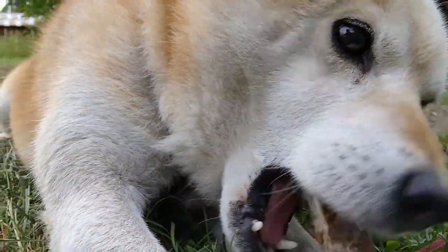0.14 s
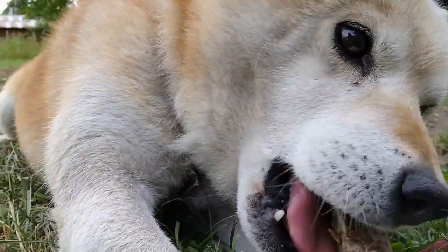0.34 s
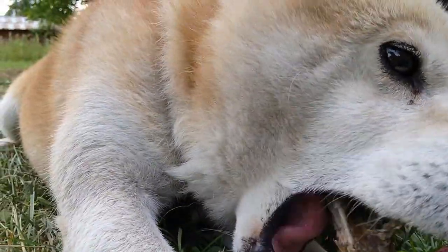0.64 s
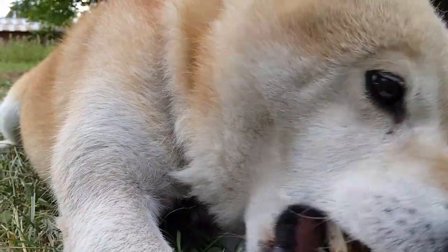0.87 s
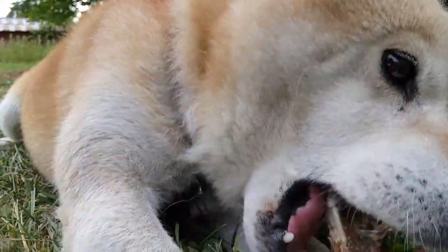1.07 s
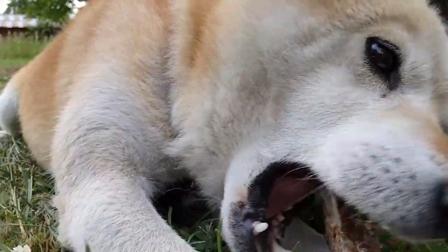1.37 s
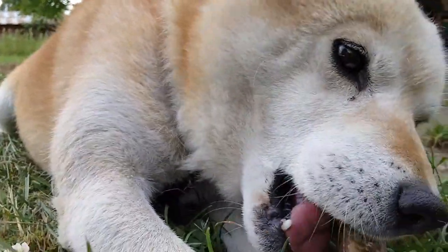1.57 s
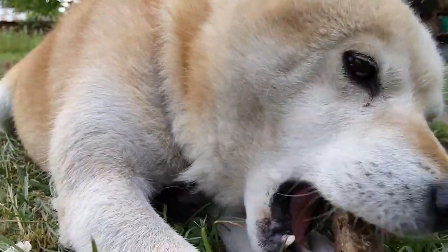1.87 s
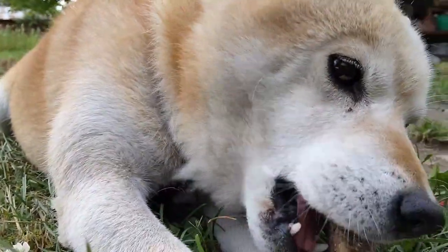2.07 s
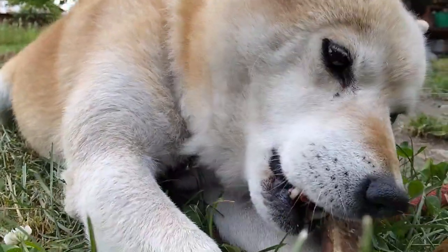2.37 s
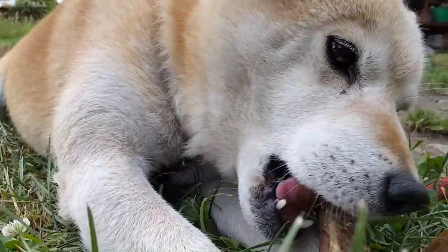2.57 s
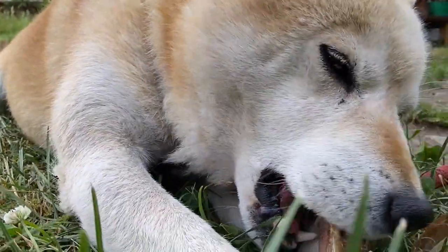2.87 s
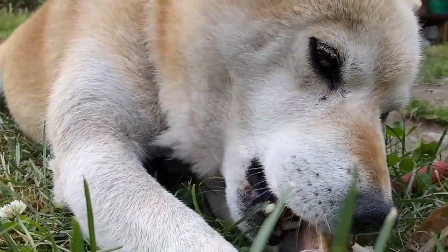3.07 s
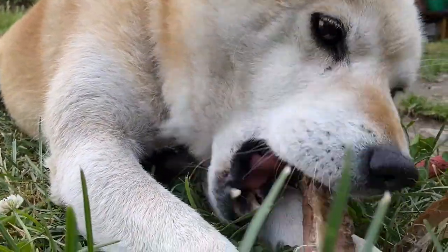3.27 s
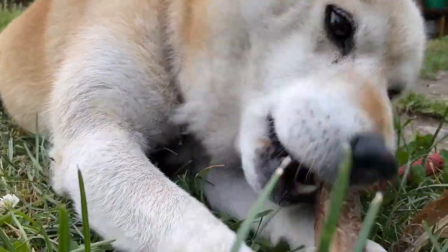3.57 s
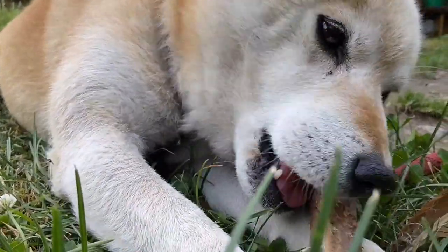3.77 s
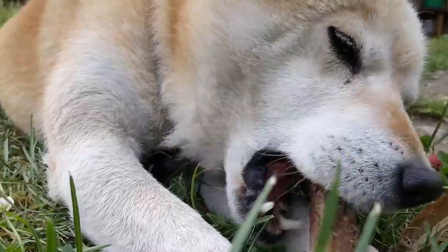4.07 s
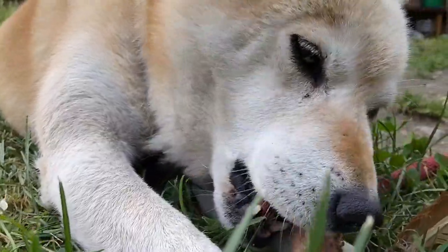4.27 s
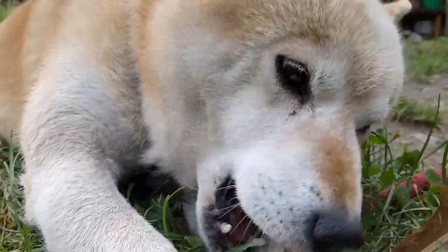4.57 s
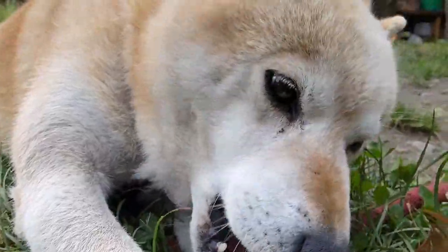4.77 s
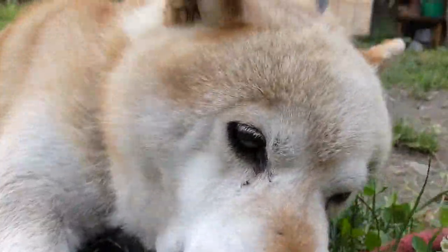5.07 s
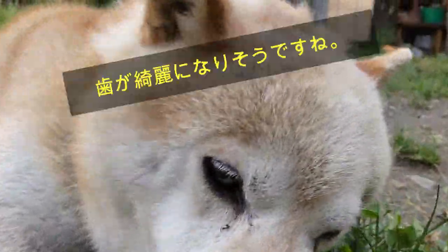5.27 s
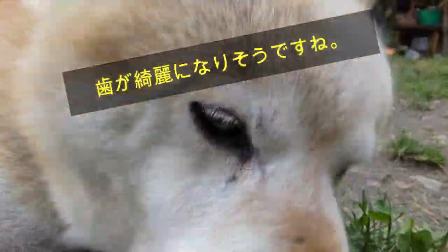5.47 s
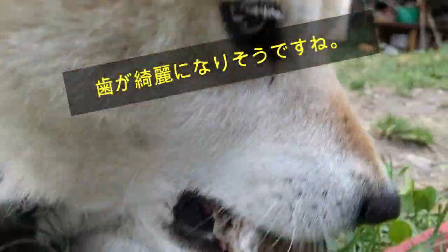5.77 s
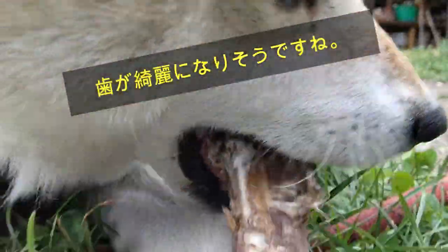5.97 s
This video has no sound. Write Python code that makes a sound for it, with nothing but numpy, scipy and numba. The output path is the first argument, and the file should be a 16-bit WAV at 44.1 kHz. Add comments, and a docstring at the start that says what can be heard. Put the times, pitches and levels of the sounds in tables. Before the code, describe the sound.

A dog gnaws a bone close by on the right, irregular sharp crunches and cracks with scraping teeth and small puffs over soft outdoor hiss.

```python
"""On a lawn, a dog gnaws a bone close to a small camera and a little to its right.
Each bite is a short run of tiny fractures that rings the bone and knocks the hollow of the mouth.
Between bites the teeth scrape; the dog puffs through nose and throat, which are resonators
driven by air noise, and grunts once. Leaves and far traffic are shaped noise: hiss and rumble.
"""
import sys
import numpy as np
from scipy import signal
from scipy.fft import rfft, irfft, next_fast_len
from scipy.io import wavfile
from scipy.ndimage import uniform_filter1d
from numba import njit

SR = 44100
rng = np.random.default_rng(int(sys.argv[2]) if len(sys.argv) > 2 else 0)


def wav_out(sig):
    """Save sig, one row per channel (or a flat mono array), as 16-bit PCM at SR to the path in sys.argv[1]."""
    wavfile.write(sys.argv[1], SR, np.round(np.clip(np.atleast_2d(sig).T, -1, 1) * 32767).astype(np.int16))


N = 270333


def undb(db):
    """Level definition: amplitude gain is ten to the power dB / 20."""
    return 10 ** (np.asarray(db) / 20)


def mode(f, hz, width):
    """Simple resonance: the response of one damped oscillator, gain 1 at its centre."""
    return 1j * f * width / (hz ** 2 - f ** 2 + 1j * f * width)


def modes(f, table):
    """Modal superposition: neighbours swing in opposite phase; squaring gives steep skirts."""
    total = 0
    for k, (hz, width, db) in enumerate(table):
        total = total + (-1) ** k * undb(db) * mode(f, hz, width) ** 2
    return total


def on_log(f, hz, value):
    """Logarithmic pitch scale: read a table by linear interpolation over log frequency."""
    return np.interp(np.log(f + 1), np.log(hz), value)


def over_time(table):
    """Envelope principle: join the points (t/s, level/dB) by straight lines, one value a sample."""
    return np.interp(np.arange(N) / SR, *np.transpose(table))


def walk(rate):
    """Random modulation: levels held 1 / rate s, then smoothed twice; spread near 1."""
    hold = int(SR / rate)
    steps = np.repeat(rng.standard_normal(N // hold + 1), hold)
    return 1.3 * uniform_filter1d(uniform_filter1d(steps, hold), hold)[:N]


# Modes of the bone shaft, its splinters and the tooth enamel, and of the jaw.
# Columns: f/Hz, width of one pass/Hz, relative level/dB
SHAFT_MODES = [(1760, 560, -5.5), (2540, 1150, -3)]
SPLINTER_MODES = [(3617, 756, 7), (3770, 686, 8.5), (5060, 2900, 0)]
ENAMEL_MODES = [(6110, 1330, 5.2), (7370, 830, 3.8), (7220, 1900, 3.8), (12500, 3900, 1)]
JAW_MODES = [(243, 300, 0), (579, 500, -4.5)]
# Stereo balance of the bites before shading. Columns: t/s, left minus right level/dB
HEAD_BALANCE = [(0, -10.5), (.8, -11.5), (1.05, -13), (1.3, 1), (2.05, -11), (2.37, -7.5), (3.6, -9.5),
                (4.8, -5), (6.13, -3)]
# Single bites. Columns: peak t/s, rise/ms, fall/ms, crack level/dB,
# brightness (-1 shaft, 0 splinter, 1 enamel), knock level/dB, mouth hollow f/Hz, width over f
BITES = [(.1267, 1.6, 2.1, -50, -.2, -50, 1200, .9), (.1373, 3, 4, -47, -0.053, -52.5, 1200, 0.75),
         (.161, 1.05, .7, -49, 0.72, -49, 700, 1.5), (.1843, .25, .9, -49, -.1, -69, 1200, .9),
         (.2064, .4, 0.97, -45, .2, -55, 1200, .9), (.2151, 2.1, 0.57, -33.5, 0.92, -46, 1200, .9),
         (.2186, 1.2, 1.4, -27, 0.02, -35.5, 1220, 0.61), (.227, 2.8, 3.8, -35.5, 0.17, -44, 980, 1.1),
         (.2432, 2, 1.6, -40, .2, -46, 980, 1.2), (.25, 6.7, 3.4, -36.5, 0.048, -34.5, 593, 2.5),
         (.2662, 1.7, 1.1, -46, 0.98, -44, 340, 0.64), (.312, 2.55, 2.4, -44, -0.36, -43.5, 1100, 0.076),
         (.3203, 5.3, 1.4, -46, -0.07, -42.5, 1080, 0.14), (.573, 0.21, .4, -50, 1.2, -69, 700, 1.5),
         (.607, 0.31, .4, -51, 0.9, -63, 1200, .9), (.6272, 0.34, .2, -43, 1.5, -62, 700, 1.5),
         (0.7482, 3.3, 10, -42, -0.15, -47.5, 1200, 1.3), (.7644, 2.1, 5.6, -44, -0.061, -49, 1180, 0.81),
         (0.8093, 1.5, 10.5, -39.5, -0.6, -39, 506, 1.2), (.817, 0.68, 1.4, -45, -0.098, -39, 680, 2.2),
         (.823, 3.4, 1.1, -37.5, -0.23, -45.5, 1200, .9), (.852, 1.4, 3.4, -44, .2, -47, 1200, 1),
         (.862, 4.3, 1.7, -44, -.3, -50, 1200, .9), (.8721, 0.81, 0.55, -34, .5, -45, 1200, .9),
         (.8957, 5.8, 1.9, -46, -0.28, -62, 1200, .9), (.903, 2.4, 2.6, -42, -0.31, -47, 800, 1.4),
         (.9154, 0.5, .4, -34, 0.85, -46, 1200, .9), (.9214, 1.9, 1.8, -34, 0.81, -43, 1200, .9),
         (.9251, .6, 0.68, -38, 0.9, -49, 1170, .9), (.9317, 2.7, .9, -49, .25, -56, 1100, .9),
         (.943, 5.1, 3.5, -36, -0.02, -43.5, 1210, 1.2),
         (.948, 1.27, 0.68, -22.5, -0.073, -31.5, 1330, 0.53),
         (.9524, 1.33, 2.5, -22.5, 0.79, -29.5, 1320, .85), (.9596, 2.3, 1.8, -29, -1.2, -33, 950, 1.1),
         (.9645, 2.3, 2.2, -37, -0.49, -37, 804, 1.4), (.9923, 0.84, 1.3, -47, -.2, -49, 600, 1.5),
         (1.0167, 0.37, 1.6, -29.5, 0.2, -42, 1030, 0.79), (1.0217, 1.8, 2.8, -38, -0.16, -38, 920, 1.6),
         (1.0275, 3.17, 2.2, -37.5, -0.63, -32, 980, 1.45), (1.1016, 0.42, 1.6, -40, 1.4, -54.5, 1200, .9),
         (1.1075, 1.3, 0.49, -38, 0.89, -56, 1150, .9), (1.2057, 0.92, 0.73, -46, -0.054, -69, 1200, .9),
         (1.4712, 0.75, 0.72, -48.5, -.5, -53, 770, 1.2), (1.5318, .55, 2.6, -59, .1, -46, 950, 0.37),
         (1.57, 0.52, .7, -50, -.4, -61, 1200, .9), (1.7958, .8, 0.35, -44.5, 1.1, -69, 700, 1.5),
         (2.0361, 3.7, 2, -46, -.6, -66, 950, 1), (2.0576, 1.6, .6, -45.5, -.2, -38, 890, 0.77),
         (2.0641, 2, 3, -48, -0.15, -47, 1170, .9), (2.073, 3.5, 5, -52, .1, -44, 1180, 0.74),
         (2.345, 0.37, 1.3, -34, 0.17, -45, 1200, 0.79), (2.356, 1.1, 1.9, -37, -0.23, -45, 900, 1.1),
         (2.3654, 0.92, 1, -45, 0.71, -28, 480, 1), (2.3679, 2.1, 1.34, -21, -0.39, -20, 926, 0.42),
         (2.377, 3.8, 3.7, -49, .5, -44, 1060, .4), (2.5677, 1.2, 4.9, -45, -0.12, -64, 1130, .9),
         (2.6066, 2.1, 1.5, -40.5, 1.4, -49, 920, 1.2), (2.8068, 0.66, 0.43, -42.5, 0.27, -68, 1200, .9),
         (2.813, .2, 0.22, -51, .1, -69, 1200, .9), (2.907, 0.88, 1.8, -56, -.4, -51, 870, 1.5),
         (2.977, 0.95, 0.55, -53, -.4, -49, 720, 1), (3.3715, 0.57, 0.38, -47, .1, -58, 1200, .9),
         (3.469, .8, .75, -61, -.05, -48, 810, 1.5), (3.486, 1.2, 4.2, -53, 0.024, -48.5, 1190, 0.83),
         (3.533, 2.7, 2.1, -45, -0.59, -43, 850, 0.34),
         (3.6067, 1.08, 1.1, -46.5, -0.79, -36.5, 1130, 0.29),
         (3.6668, 3.3, 1.55, -40, 0.27, -38, 1020, 0.68), (3.6724, 1.17, 2.8, -29, -0.099, -37, 920, 0.74),
         (3.6765, 1.9, 1.9, -54, .5, -29, 580, 0.93), (3.7021, 0.69, 1.2, -52, 0.44, -40.5, 1020, 0.2),
         (3.754, 1.1, 1.4, -63, .6, -43.5, 790, 0.75), (4.114, 0.41, .4, -49, -0.045, -53, 1200, .9),
         (4.1548, 4.7, 1.9, -48.5, -.9, -41.5, 860, .17), (4.1616, 0.56, 2.2, -57, -0.6, -35.5, 860, 0.82),
         (4.7096, .7, 4.2, -45, -.5, -32, 700, 0.96), (4.72, 2.3, 1.6, -58, -.8, -42, 690, 0.65),
         (4.7936, 0.61, 2.5, -38.5, -0.21, -45, 1240, 1.2),
         (4.7992, 0.78, 2.1, -35.5, 0.93, -42.5, 1280, .9), (4.9252, .75, 1.1, -60, .7, -48.5, 507, 0.77),
         (5.1614, 0.92, .6, -63, .5, -35.5, 490, 0.81), (5.209, 1.2, .6, -51, -0.13, -47, 875, 1),
         (5.237, 0.67, 1.8, -43.5, -1.2, -35, 710, 0.81), (5.248, 1, 0.61, -57, -.2, -40, 595, 1.1),
         (5.2968, 0.75, .8, -63, -.9, -44.5, 780, 1.7), (5.4204, 0.61, .3, -38.5, 1.24, -69, 1200, .9),
         (5.7072, 3.1, 4.7, -57, .9, -48, 800, 1.1), (5.7183, 2.08, 1.4, -63, .5, -32.5, 1355, 0.17),
         (5.7567, .6, .9, -62, -0.73, -46, 1200, 1.4), (5.837, 0.88, 0.93, -51.5, -.5, -42, 580, 0.47)]


def bites(grit_db=4.0, early=0.385, shadow_hz=756.0, lag_ms=0.027, window_ms=2.82):
    """Brittle fracture: bursts of uneven impulses excite the modes of bone, teeth, mouth and jaw."""
    span = 4096  # samples for each bite
    columns = [column[:, None] for column in np.transpose(BITES)]
    t_peak, rise, fall, crack_db, bright, knock_db, hollow_hz, width = columns

    # more knock than crack: one clean blow in a closed mouth; closed stays below 2/3
    closed_at_db, closed_span_db = 8, 2  # knock over crack, and how gradually
    closed = 1 / (1.5 + np.exp((closed_at_db - knock_db + crack_db) / closed_span_db))
    snap_db = 17.5 + (29.5 - 17.5) * closed  # over the grit
    jaw_db = -7.5 + (-8.5 + 7.5) * closed  # relative to the knock
    off_part_db = 7  # loss one part away from the brightness
    bone_db = [crack_db - off_part_db * (part - bright) ** 2 for part in (-1, 0, 1)]
    part_db = [knock_db + jaw_db, knock_db] + bone_db
    # a closed knock sits nearer the middle
    pan_db = np.interp(t_peak, *np.transpose(HEAD_BALANCE)) * (1 - .6 * closed)

    f, lead = np.fft.rfftfreq(span, 1 / SR), span // 4
    ms = (np.arange(span) - lead) / SR * 1000
    force = np.exp(-np.where(ms < 0, -ms / rise, ms / fall))

    def fractures():
        # sizes with an exponential spread in dB: many small fractures, a few sharp ones
        turn, size = rng.random((2, len(t_peak), span))
        return force * np.sign(turn - .5) * undb(-grit_db * np.log(1 - size))

    # one main snap, a share of the rise time ahead of the peak
    snap = -undb(snap_db) * np.exp(-2j * np.pi * f * (lead / SR - early * rise / 1000))
    direct = rfft(fractures()) + snap

    # the muzzle shadows the left port above shadow_hz and adds a scattered path
    shade = f ** 2 / (f ** 2 + shadow_hz ** 2)
    scattered = .9 * shade  # share of the power at the left port
    delay = np.exp(-2j * np.pi * f * lag_ms / 1000)
    left = np.sqrt(1 - scattered) * direct * delay + np.sqrt(scattered) * rfft(fractures())
    ports = np.array([left * undb(pan_db * shade / 2), direct * undb(-pan_db * shade / 2)])

    # the hollow rings on top of a short, broad clack
    clack_db, clack_width = -21.5, 1.2  # relative to the ring; width over pitch
    ring = mode(f, hollow_hz, width * hollow_hz) ** 2
    clack = undb(clack_db) * mode(f, hollow_hz, clack_width * hollow_hz) ** 2
    shapes = [modes(f, JAW_MODES), ring + clack]
    shapes += [modes(f, part) for part in (SHAFT_MODES, SPLINTER_MODES, ENAMEL_MODES)]

    sound = 0
    for shape, db in zip(shapes, part_db):
        pair = irfft(ports * shape)
        # the level is that of the loudest short window of the two-channel mean
        power = uniform_filter1d(pair.mean(0) ** 2, int(window_ms * SR / 1000))
        sound = sound + pair * undb(db) / np.sqrt(power.max(1, keepdims=True))
    out = np.zeros((2, N + 2 * span))
    for k, start in enumerate((t_peak[:, 0] * SR).astype(int) - lead + span):
        out[:, start:start + span] += sound[:, k]
    return out[:, span:span + N]


# Teeth scraping between bites. Columns: t/s, level/dB (before panning)
SCRAPE = [(0, -70), (.27, -50), (.35, -81), (.72, -62), (.8, -53), (.96, -44), (1.005, -60), (1.04, -52),
          (1.12, -62), (1.6, -56), (1.75, -92), (2.02, -55), (2.12, -80), (2.36, -48.5), (2.5, -57),
          (3.4, -83), (3.52, -58.5), (3.8, -57.5), (4.15, -61), (4.4, -59), (5.0, -66), (5.25, -55.5),
          (5.5, -62.5), (6.13, -73)]


def grind(per_second=1800., grit_db=4.0, patchy_db=6.5, pan_db=-6.5, low_db=4.0, top_db=-2.0):
    """Random impulse excitation: crumbs of bone give way under the teeth, in patches."""
    hit, size, turn = rng.random((3, N))
    crumb_db = -grit_db * np.log(1 - .99 * size) + patchy_db * walk(60)
    crumbs = (hit < per_second / SR) * np.sign(turn - .5) * undb(crumb_db)
    f = np.fft.rfftfreq(N, 1 / SR)
    bone = undb(low_db) * mode(f, 1360.0, 620.0)
    bone = bone + modes(f, SHAFT_MODES) + modes(f, SPLINTER_MODES)
    bone = bone + undb(top_db) * modes(f, ENAMEL_MODES)
    sound = irfft(rfft(crumbs) * bone, N)
    sound = sound / sound.std() * undb(over_time(SCRAPE))
    # left comes 3 samples later
    return np.array([np.roll(sound, 3) * undb(pan_db / 2), sound * undb(-pan_db / 2)])


@njit
def sliding_resonance(x, hz, width):
    """State-variable resonance: two integrators in a loop form a band-pass with a moving centre."""
    y, band, low = np.empty(len(x)), 0., 0.
    for i in range(len(x)):
        g, damping = np.tan(np.pi * hz[i] / SR), width / hz[i]
        v = (band + g * (x[i] - low)) / (1 + g * (g + damping))
        band, low, y[i] = 2 * v - band, low + 2 * g * v, damping * v
    return y


# Breaths. Columns: start t/s, length/s, throat level/dB, nose level/dB (at the height of
# the flow, before panning), nose f/Hz at the start
PUFFS = [(0.344, .019, -58, -70, 3500), (1.402, 0.061, -77, -57, 3300), (1.846, .093, -80, -52.5, 4250),
         (2.143, 0.17, -58.5, -74, 3500), (2.397, .16, -51, -55.5, 3370), (2.622, 0.077, -62.5, -64, 3000),
         (2.977, 0.062, -84, -58.5, 3420), (3.13, 0.099, -56.5, -82, 3500), (3.642, 0.033, -60, -47, 4400),
         (3.665, 0.069, -55.5, -56, 3900), (4.238, 0.13, -60.5, -58.5, 4150),
         (5.06, 0.14, -74, -59.5, 3650), (5.84, 0.033, -57, -56, 2050)]


def puffs(throat_width=150., nose_width=600., flutter_db=1.5, pan_db=-6.0):
    """Turbulence noise: air excites a narrow throat resonance and a wider, sinking nose one."""
    throat_hz, nose_sag = 1085., 0.2  # the nose sinks by this share over a puff
    t = np.arange(N) / SR
    throat, nose, nose_hz = np.zeros(N), np.zeros(N), np.full(N, 3000.)
    for start, length, throat_db, nose_db, from_hz in PUFFS:
        u = (t - start) / length
        on = (u > 0) & (u < 1)
        flow = np.sqrt(np.sin(np.pi * u[on]))
        throat[on], nose[on] = undb(throat_db) * flow, undb(nose_db) * flow
        nose_hz[on] = from_hz * (1 - nose_sag * u[on])
    air = rng.standard_normal(N) * undb(flutter_db * walk(70))

    def resonate(hz, width):
        # make up for the power lost outside the band
        return sliding_resonance(air, hz, width) * np.sqrt(SR / (np.pi * width))

    both = throat * resonate(np.full(N, throat_hz), throat_width)
    both = both + nose * resonate(nose_hz, nose_width)
    return both * undb(np.array([[pan_db], [-pan_db]]) / 2)


# The one grunt. Values: start t/s, length/s, f/Hz, peak level/dB
GRUNT = (3.495, .045, 215, -50)


def grunt():
    """Pure tone: a short low hum from the throat under a rounded envelope, alike in both channels."""
    start, length, hz, db = GRUNT
    t = np.arange(N) / SR - start
    swell = np.sqrt(np.sin(np.pi * np.clip(t / length, 0, 1)).clip(0))
    return undb(db) * swell * np.sin(2 * np.pi * hz * t)


# Background spectrum. Columns: f/Hz, relative level per Hz/dB,
# likeness of the channels (0 to 1), left minus right level/dB
GARDEN = [(25.7, 8.5, 0.5, 5), (42, -3.5, 0.1, 5), (70, -2, 0.2, -3), (111, -5.5, 0.9, -3),
          (190, 0, 0.76, -0.5), (337, 1, 0.88, -2), (560, -4, 0.52, -1), (850, -9, 0.56, -1.5),
          (1830, -7.5, 0, -3.5), (3400, -6.5, 0, -6), (5470, -9, 0.01, -6), (7640, -7, 0.06, -10),
          (12900, -9, 0.04, -2)]
# Swell of the leaves. Columns: t/s, relative level/dB
LEAVES = [(0, -.5), (3.4, 0), (3.8, 1), (5.4, 1), (6.13, 0)]
# Wind in the lowest bands; only departures from the mean count. Columns: t/s, level/dB
WIND = [(0, -61), (.6, -69), (.94, -59), (1.67, -71), (2.37, -62), (2.8, -73), (3.6, -69), (5.75, -68),
        (6.13, -46)]


def garden(level_db=-48, flicker_db=.6, gust_db=1.5, wind_hz=70.):
    """Diffuse field: partly coherent noise in octave bands that flicker alone; wind stirs the lowest."""
    hz, db, alike, pan_db = np.transpose(GARDEN)
    f = np.fft.rfftfreq(N, 1 / SR)
    coherence = np.clip(on_log(f, hz, alike), 0, 1)
    noise = rfft(rng.standard_normal((2, N)))
    mid, side = noise * np.sqrt([1 + coherence, 1 - coherence])
    pan = on_log(f, hz, pan_db) / 2
    pair = np.array([(mid + side) * undb(pan), (mid - side) * undb(-pan)])
    pair = pair * undb(on_log(f, hz, db))
    swell_db, wind_db = over_time(LEAVES), over_time(WIND)
    wind_db = wind_db - wind_db.mean()
    out = 0
    for octave in range(5, 15):  # centred on 2 ** octave Hz
        band = np.clip(1 - abs(np.log2(f + 1) - octave), 0, 1)
        windy = wind_hz ** 2 / (wind_hz ** 2 + 4 ** octave)
        move_db = flicker_db * walk(8.3)
        move_db = move_db + windy * (wind_db + gust_db * walk(6.4)) + (1 - windy) * swell_db
        out = out + irfft(pair * band, N) * undb(move_db)
    return out * undb(level_db) / np.sqrt(np.mean(out ** 2))


def scene():
    """Linear superposition: the dog close by, the garden all around."""
    return bites() + grind() + puffs() + grunt() + garden()


# Microphone response. Columns: f/Hz, gain level/dB
MIC_RESPONSE = [(8000, 2), (8500, -3), (9500, -11.5), (10600, -19.5), (14200, -15), (14600, -46)]


def record(dry, hiss_db=-61.5, hiss_hz=9600, hiss_top_hz=14350, top_hz=15500):
    """Transducer response: the microphones lose the top octave and add their own faint high hiss."""
    size = next_fast_len(N)
    f = np.fft.rfftfreq(size, 1 / SR)
    heard = rfft(dry, size) * undb(on_log(f, *np.transpose(MIC_RESPONSE)))
    hiss = rfft(rng.standard_normal(dry.shape), size) * undb(hiss_db)
    hiss = hiss / (1 + (hiss_hz / (f + 1)) ** 6) * (f < hiss_top_hz)
    low_pass = signal.ellip(12, .2, 100, top_hz, fs=SR, output="sos")
    return signal.sosfilt(low_pass, irfft(heard + hiss, size)[:, :N])


dry = scene()
out = record(dry)
wav_out(out)
```